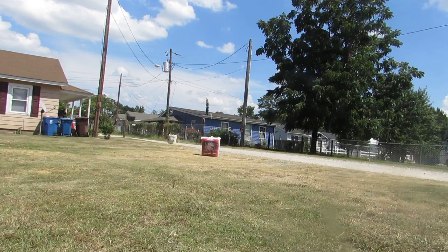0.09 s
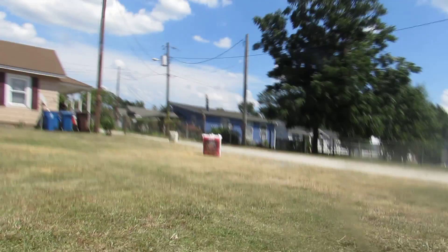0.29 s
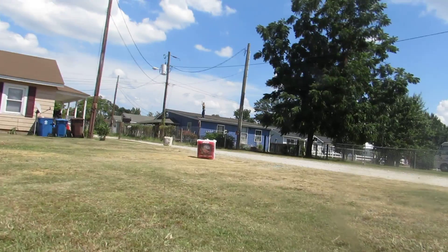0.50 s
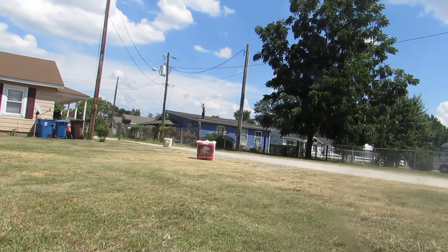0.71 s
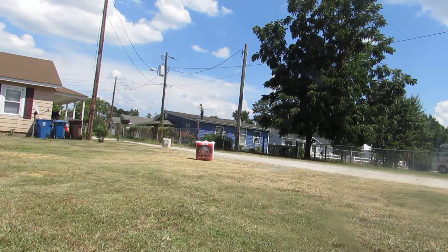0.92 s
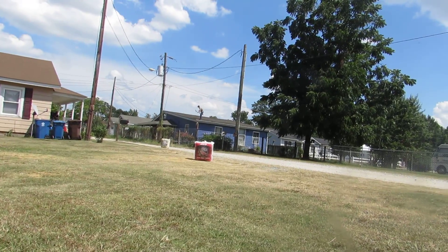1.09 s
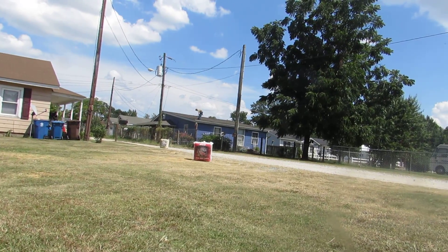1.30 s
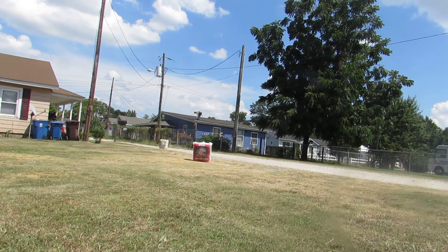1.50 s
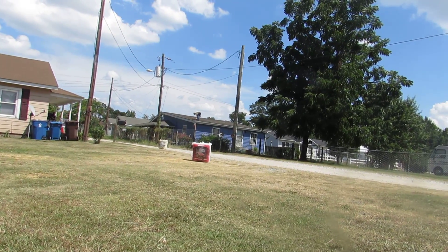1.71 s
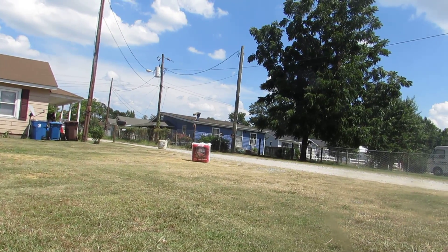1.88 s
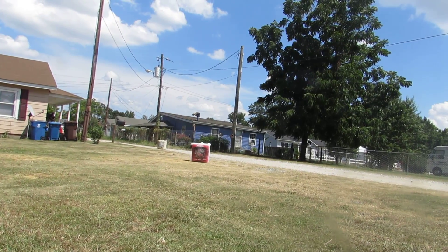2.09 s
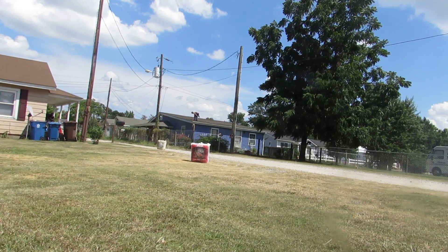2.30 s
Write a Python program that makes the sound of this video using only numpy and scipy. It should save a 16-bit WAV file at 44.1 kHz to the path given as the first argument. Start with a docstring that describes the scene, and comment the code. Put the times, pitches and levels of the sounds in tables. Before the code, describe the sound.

An arrow strikes a block target at about 0.2 seconds: a thin hiss swells into one sharp smack with a low thump, slightly overloading the microphone. The shaft rattles until about 0.3 seconds. Soft wind rumble and hiss dip after the hit and creep back. Distant birds chirp faintly near 0.4, 0.9 and 1.6 seconds, while a thin high whine lingers and faint insects swell around 2 seconds.

```python
"""Arrow into a block target

In an open yard a thin hiss swells into one sharp smack with a low thump, then the shaft rattles briefly.
Wind rumbles and hisses, far birds chirp, insects shimmer and a thin whine hangs in the air.
The smack overloads the microphone; gain control ducks the yard and lets it creep back."""
import sys
import numpy as np
from scipy import signal
from scipy.fft import rfft, irfft
from scipy.io import wavfile
from scipy.ndimage import uniform_filter1d

SR = 44100
rng = np.random.default_rng(int(sys.argv[2]) if len(sys.argv) > 2 else 0)


def materialize(psi):
    """Save the field psi as 16-bit PCM at rate SR to the path in sys.argv[1].

    A 1-D psi becomes a single channel; in a 2-D psi each row is a channel.
    """
    bounded = np.clip(np.atleast_2d(psi).T, -1, 1)
    quanta = np.round(bounded * 32767).astype(np.int16)
    wavfile.write(sys.argv[1], SR, quanta)


N = 110250
T = np.arange(N) / SR
HIT_S = .2021
CRACK_S = HIT_S + .00224

# Stereo width of the yard. Each row: frequency in Hz, left-right correlation (capped at 1 in use).
YARD_LIKENESS = [(60, 4.1), (250, 0.42), (1000, 0.55), (2500, 0.99), (6000, 1.04), (12000, -0.2)]
# Stereo balance of the yard. Each row: frequency in Hz, left minus right in dB.
YARD_LEAN = [(60, 0.53), (250, 1), (700, -1.2), (2000, -1.4), (6000, -0.16), (12000, -1.3)]
# Stereo width of the arrow. Each row: frequency in Hz, left-right correlation.
ARROW_LIKENESS = [(500, 0.65), (2500, 0.96), (5000, 0.78), (8000, 0.68), (12000, 0.65)]
# Stereo balance of the arrow. Each row: frequency in Hz, left minus right in dB.
ARROW_LEAN = [(500, -1), (3000, -1.5), (6000, -0.5), (9000, 3.5), (14000, -1)]


def amp(db):
    """Decibels to gain."""
    return 10 ** (np.asarray(db) / 20)


def unit(x):
    """Scales to rms 1."""
    return x / np.sqrt(np.mean(x ** 2) + 1e-20)


def curve(points, hz):
    """Reads a table on a log-frequency axis."""
    f, value = np.transpose(points)
    return np.interp(np.log(hz + 1), np.log(f + 1), value)


def drift(rate_hz):
    """Smooth random motion of rms 1, mostly slower than the given rate."""
    hz = np.fft.rfftfreq(N, 1 / SR)
    return unit(irfft(rfft(rng.standard_normal(N)) * (hz > 0) / (1 + (hz / rate_hz) ** 4), N))


def noise(colour, likeness=YARD_LIKENESS, lean=YARD_LEAN, tilt_db=0):
    """Stereo noise of rms 1 with a given colour, width and balance, tilted per octave around 3 kHz."""
    hz = np.fft.rfftfreq(N, 1 / SR)
    common, separate = rfft(rng.standard_normal((2, N)))
    same = np.clip(curve(likeness, hz), -1, 1)
    side = amp(curve(lean, hz) / 2)
    pair = np.array([common * side, (same * common + np.sqrt(1 - same ** 2) * separate) / side])
    return unit(irfft(pair * amp(curve(colour, hz) + tilt_db * np.log2(hz / 3000 + .1)), N))


def burst(at, rise_s, fall_s):
    """Envelope that swells to 1 at a moment and dies away."""
    return np.exp(-np.maximum(at - T, 0) / rise_s - np.maximum(T - at, 0) / fall_s)


def scatter(x, t60_s=.073):
    """Short diffuse tail thrown back by the lawn and things nearby."""
    tail = noise([(200, 0), (3000, 0), (12000, -8)]) * amp(-60 * T / t60_s)
    return signal.fftconvolve(x, tail / np.linalg.norm(tail[0]), axes=1)[:, :N]


def whine(rest_db=-6, swell_s=.5, waver_db=1.8, wander_hz=10):
    """Faint high tones that swell and waver, each reaching the two channels out of step."""
    # The tones. Each row: pitch in Hz, level at the crest in dB, time of the crest in seconds.
    tones = [(3960, -68, 2.35), (4395, -66, 1.5), (4640, -70, 1.3), (5130, -71, 2.1), (5830, -68, .4),
             (5930, -64, .6), (5959, -66, 2.3), (6350, -67, 1.4), (6444, -70, 2.0), (6560, -67, .5),
             (6805, -70, 1.6), (6842, -63, 2.05), (7080, -65, 1.2), (7337, -70, 2.4), (7537, -66, .1),
             (7700, -73, 2.3), (7913, -71, 2.4), (8021, -67, .1), (8053, -67, 1.1), (8549, -68, 1.15),
             (9044, -68, 1.7), (9480, -72, 1.3), (9980, -74, 1.9)]
    out = np.zeros((2, N))
    for hz, db, crest in tones:
        phase = 2 * np.pi * np.cumsum(hz + wander_hz * drift(45)) / SR
        resting = 1 - np.exp(-((T - crest) / swell_s) ** 2)
        level = amp(db + rest_db * resting + waver_db * drift(4))
        out += np.sqrt(2) * level * np.sin(phase + rng.normal(0, .7, (2, 1)))
    return out


def insects():
    """Far insects: a soft, wide shimmer that grows slowly and eases at the end."""
    # Colour of the shimmer. Each row: frequency in Hz, relative level in dB.
    colour = [(1500, -30), (2500, -0.5), (3400, -7.5), (4400, -10), (5400, -8), (6600, -10.5), (8800, -10),
              (10200, -9), (15000, -17)]
    # Swell of the shimmer. Each row: time in seconds, level in dB.
    swell = [(0, -71), (.7, -66), (1.3, -68.5), (1.8, -63.5), (2.15, -58.5), (2.5, -65.5)]
    shimmer = noise(colour, likeness=[(2000, .59), (5000, 1.0), (10000, .13)])
    return amp(np.interp(T, *np.transpose(swell))) * shimmer


def birds(blur_hz=150, wet=.7):
    """Short falling or level notes, blurred by distance."""
    # The calls. Each row: start and length in seconds, first and last pitch in Hz, level in dB.
    chirps = [(0.344, 0.077, 6490, 5840, -48.5), (0.393, 0.086, 2196, 2200, -54),
              (0.874, 0.087, 6600, 5630, -50), (1.547, 0.16, 2530, 2490, -53)]
    out = np.zeros(N)
    for at, length, start_hz, end_hz, db in chirps:
        progress = np.clip((T - at) / length, 0, 1)
        hz = start_hz + (end_hz - start_hz) * progress + blur_hz * drift(135)
        out += amp(db) * np.sin(np.pi * progress) * np.sin(2 * np.pi * np.cumsum(hz) / SR)
    return (1 - wet) * out + wet * scatter(out[None])


def wind(air_db=-45.5):
    """Wind on the microphone: a lumpy rumble and two buffets, with the steady hiss of the yard."""
    # Strength of the rumble. Each row: time in seconds, level in dB.
    gusts = [(0, -42.5), (.09, -37), (.2, -36.5), (.42, -37.5), (.55, -41.5), (.63, -37), (.95, -38),
             (1.3, -38.5), (1.5, -39), (1.74, -37.5), (1.85, -45), (2.0, -36.5), (2.25, -39), (2.5, -40.5)]
    # Colour of the rumble. Each row: frequency in Hz, relative level in dB.
    rumble_colour = [(15, -54), (35, -12), (65, -2), (95, -4), (120, 2.5), (165, -9.5), (230, -10.5),
                     (330, -20.5), (700, -49)]
    # Low buffets. Each row: centre in seconds, level in dB, half-width in seconds, pitch in Hz.
    puffs = [(0.326, -17, 0.0026, 130), (.422, -22, 0.0064, 75)]
    # Colour of the air over the yard. Each row: frequency in Hz, relative level in dB.
    air_colour = [(100, 0), (300, 0.5), (550, -0.5), (900, -1), (1400, -4.5), (2000, -14.5), (3300, -21),
                  (4500, -20), (5400, -22), (6500, -21), (9000, -20.5), (11000, -28), (15500, -55)]
    rumble = amp(np.interp(T, *np.transpose(gusts))) * noise(rumble_colour)
    buffets = sum(amp(db) * np.exp(-((T - at) / width) ** 2) * np.cos(2 * np.pi * hz * (T - at))
                  for at, db, width, hz in puffs)
    return rumble + buffets + amp(air_db) * noise(air_colour)


def flight(hiss_db=-48, growth_db_per_s=59, rush_db=-36.5, rush_s=.015):
    """The arrow in the air: a thin hiss grows, rushing up just before it lands."""
    # Colour of the hiss. Each row: frequency in Hz, relative level in dB.
    colour = [(300, -8), (1500, 2), (4000, -3), (8000, -1.5), (12000, -1.5), (15500, -6)]
    to_hit_s = abs(HIT_S - T)
    level = amp(hiss_db - growth_db_per_s * to_hit_s) + amp(rush_db) * np.exp(-to_hit_s / rush_s)
    return level * (T < CRACK_S) * noise(colour, ARROW_LIKENESS, ARROW_LEAN)


def rattle():
    """The quivering shaft ticks and scrapes a few times."""
    # The ticks. Each row: peak time in seconds, level in dB, rise and fall in seconds,
    # treble tilt in dB per octave.
    ticks = [(.2320, -24, 0.00043, 0.0004, 0), (0.2374, -7.5, 0.0001, .0009, 9),
             (0.2376, -16, 0.0012, 0.0021, 1), (0.252, -28.5, 0.0018, 0.0011, 0),
             (0.2594, -18, 0.0025, 0.0039, -2), (0.281, -26.5, 0.0059, 0.0041, -2),
             (0.3016, -21, 0.0025, 0.0014, 1), (0.3093, -18, 0.00056, .0015, -1)]
    # Colour of the ticks. Each row: frequency in Hz, relative level in dB.
    colour = [(150, -8), (450, 2), (1300, -1), (1900, -4), (2650, 1), (3300, -5), (5200, -11), (7300, -6),
              (9000, -15), (10700, -16), (15500, -28)]
    return sum(amp(db) * burst(at, rise, fall) * noise(colour, ARROW_LIKENESS, ARROW_LEAN, tilt)
               for at, db, rise, fall, tilt in ticks)


def crack(level_db=-8.5, tail_db=-15.5, rise_s=.00075):
    """The bright smack at the height of the blow: a snap of noise with a short tail."""
    # Colour of the smack. Each row: frequency in Hz, relative level in dB.
    colour = [(200, -10), (1000, -16), (1900, -6.5), (2200, 4.5), (3100, -5), (4000, 2.5), (5500, -12),
              (7500, -5), (9500, -11.5), (11300, -6), (15500, -17)]
    snap = burst(CRACK_S, rise_s, fall_s=.00087)
    tail = amp(tail_db) * burst(CRACK_S, rise_s, fall_s=.0054)
    return amp(level_db) * (snap + tail) * noise(colour, ARROW_LIKENESS, ARROW_LEAN)


def thump():
    """The blow on the target: a low, well damped push whose pitch sags, with a few dead resonances."""
    # Ring of the blow. Each row: frequency in Hz, level in dB, seconds to fall by 60 dB.
    modes = [(418, -8, 0.056), (488.5, 4, 0.018), (754, -1, 0.02), (860, -9.5, 0.018), (1461, -4, 0.012)]
    start_hz, end_hz, sag_s = 236, 123, .0067
    push_db, peak_s, damping = 3, .007, 1.49
    ring_lag_s, ring_rise_s = .00115, .0014
    age = np.maximum(T - HIT_S, 0)
    hz = end_hz + (start_hz - end_hz) / (1 + (age / sag_s) ** 4)
    envelope = age / peak_s * np.exp((1 - (age / peak_s) ** damping) / damping)
    push = amp(push_db) * envelope * np.sin(2 * np.pi * np.cumsum(hz * (age > 0)) / SR)
    ring_age = np.maximum(age - ring_lag_s, 0)
    ring = sum(amp(db - 60 * ring_age / t60) * np.sin(2 * np.pi * f * ring_age) for f, db, t60 in modes)
    ring *= 1 - np.exp(-ring_age / ring_rise_s)
    return push * amp([[.45], [-.45]]) + ring * amp([[-.7], [.7]])  # push leans left, ring right


def scene():
    """The arrow and its short reflections over the bed of the yard."""
    smack, ticks = crack(), rattle()
    arrow = thump() + smack + ticks + flight()
    reflections = scatter(amp(-22) * smack + amp(-11.5) * ticks)
    return arrow + reflections + wind() + birds() + insects() + whine()


def record(dry):
    """Bass cut, gain control that ducks fast and recovers slowly, overload, faint tone, band limit."""
    low_cut_hz, high_cut_hz = 12, 15950
    threshold_db, attack_s, recover_s = -14, .012, .75
    tone_hz, tone_db, beat_hz, beat_depth = 15735, -80.5, 13, .35
    dry = signal.sosfilt(signal.butter(1, low_cut_hz, "highpass", fs=SR, output="sos"), dry)
    power_db = 10 * np.log10(abs(uniform_filter1d((dry ** 2).mean(0), size=200)) + 1e-12)
    excess_db = np.maximum(power_db - threshold_db, 0)
    release = np.exp(-T / recover_s)
    held_db = np.maximum.accumulate(excess_db / release) * release  # each peak is caught, then let go
    pole = np.exp(-1 / (attack_s * SR))
    duck_db = signal.lfilter([1 - pole], [1, -pole], held_db)
    clipped = np.clip(dry / amp(duck_db), -1, 1)
    beat = 1 + beat_depth * np.sin(2 * np.pi * beat_hz * T)
    electronic_tone = np.sqrt(2) * amp(tone_db) * beat * np.sin(2 * np.pi * tone_hz * T)
    lowpass = signal.firwin(801, high_cut_hz, window=("kaiser", 8), fs=SR)
    return signal.oaconvolve(clipped + electronic_tone, lowpass[None], "same", axes=1)


dry = scene()
out = record(dry)
materialize(out)
```